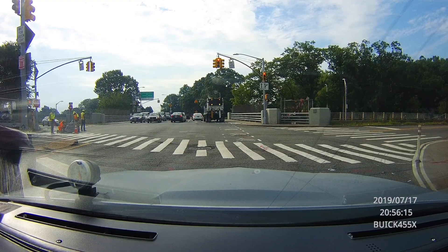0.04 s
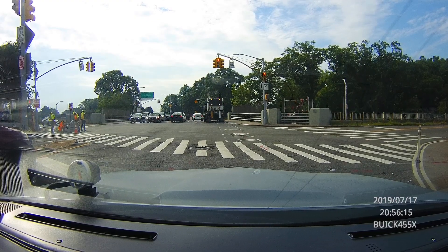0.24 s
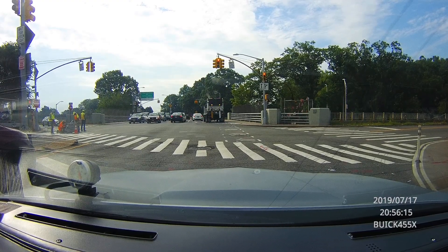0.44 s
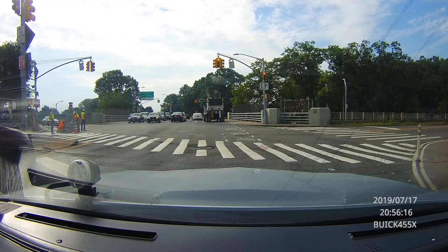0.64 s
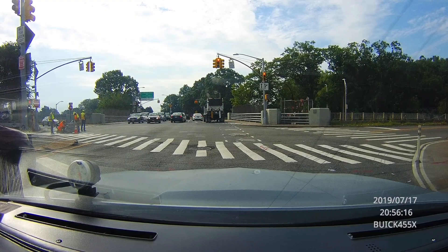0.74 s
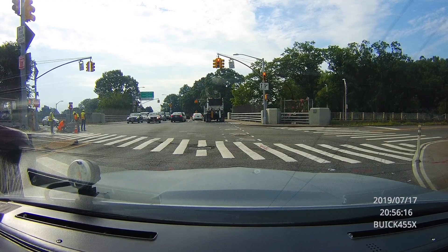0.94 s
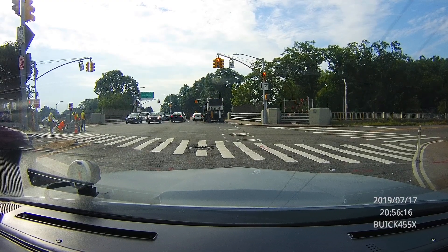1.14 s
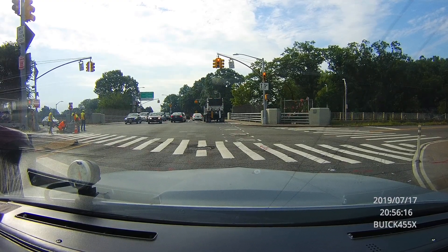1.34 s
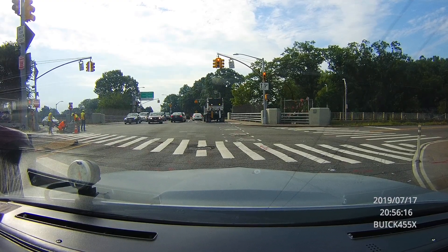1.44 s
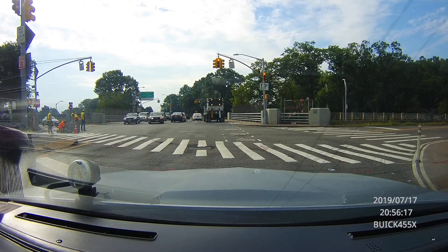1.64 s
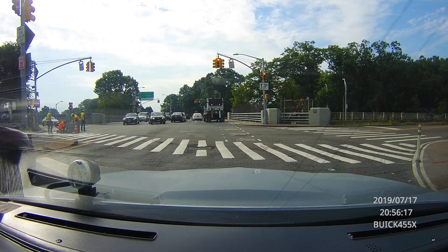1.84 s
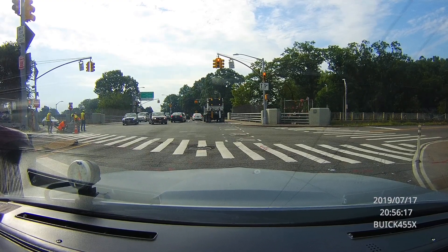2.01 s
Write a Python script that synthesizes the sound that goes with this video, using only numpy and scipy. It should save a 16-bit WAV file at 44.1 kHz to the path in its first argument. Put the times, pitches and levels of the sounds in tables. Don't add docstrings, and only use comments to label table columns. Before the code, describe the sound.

Inside a stopped car, a V8 idle rumbles low and lumpy throughout, firings thumping the floor and doors, trim knocking lightly, thin whines and tiny belt squeaks beneath; mono, dull on top, picked up at the dashboard.

```python
import sys
import numpy as np
from scipy import signal
from scipy.io import wavfile
from scipy.ndimage import uniform_filter1d

SR = 44100
rng = np.random.default_rng(int(sys.argv[2]) if len(sys.argv) > 2 else 0)


def elevation(decibels):
    levels = np.asarray(decibels, float)
    return 10 ** (levels / 20)


def digitize_waveform(pressure):
    field = np.atleast_2d(pressure).T
    bounded = np.clip(field, -1, 1)
    quanta = np.round(bounded * 32767).astype(np.int16)
    wavfile.write(sys.argv[1], SR, quanta)


N = 91463


def evened(x):
    return x / np.sqrt(np.mean(x ** 2) + 1e-20)


def add(mix, s, sound):
    part = mix[max(round(s * SR), 0):][:len(sound)]
    part += sound[:len(part)]


def resonate(x, hz, width_hz):
    spin = np.exp(2j * np.pi * hz * np.arange(len(x)) / SR)
    r = np.exp(-np.pi * width_hz / SR)
    smooth = signal.lfilter([(1 - r) ** 2], [1, -2 * r, r * r], x / spin)
    return 2 * (spin * smooth).real


def body(drive, modes):
    return sum(elevation(db) * evened(resonate(drive, hz, width_hz)) for hz, width_hz, db in modes)


def slow(rate_hz):
    pole = np.exp(-2 * np.pi * rate_hz / SR)
    return evened(signal.lfilter([1], [1, -pole], rng.standard_normal(N)))


def blows(table, gain_db, half_s, glide):
    out = np.zeros(N + SR)
    t = np.arange(-half_s, 2 * half_s, 1 / SR)
    stretched = np.where(t < 0, t / half_s / 0.85, t / half_s / 1.47)
    shape = np.cos(np.pi / 2 * np.clip(stretched, -1, 1)) ** 2
    for (s, db, hz), lag in zip(table, rng.random(len(table))):
        ring = np.cos(2 * np.pi * (hz * t * (1 + glide * t / half_s) + lag))
        add(out, s - half_s + 1, elevation(db + gain_db) * shape * ring)
    return out[SR:]


# time in seconds, engine speed in four-stroke cycles per second [Hz].
IDLE_SPEED = [(0, 4.39), (0.131, 4.18), (.33, 4.49), (.48, 3.92), (.64, 3.95), (.73, 4.38), (.9, 4.25),
              (1.1, 4.54), (1.23, 4.51), (1.34, 4.35), (1.45, 4.36), (1.6, 4), (1.73, 4.53), (1.83, 4.32),
              (1.948, 4.33), (2.07, 4.1)]


def cycles():
    s, hz = np.transpose(IDLE_SPEED)
    speed = uniform_filter1d(np.interp(np.arange(N) / SR, s, hz), size=2000)
    return np.cumsum(speed) / SR


# dash buzz, valve clatter, bright fizz, all in dB.
TURN_STRENGTHS = [(0, 2, -1.5), (5, 1, 1), (-2.5, 3.2, -1), (3.5, -1.2, -3), (-3, 0.5, -.5),
                  (-4.5, -2, -4.5), (1, -.8, -1.5), (-2.5, 5, 1), (0, -1.5, -3.5), (3, 2.5, 1),
                  (1.5, -.3, -3), (-1.5, -1, -2), (-0.5, 1, -1), (-4.5, -1, -5.5), (-1, 1, 1),
                  (-1.5, 0.5, -2), (2.5, -0.7, -0.5), (0, -1.5, -0.5), (4, 4.5, 2)]


def shake(at, depth_db, puff_db, column):
    turn = 2 * cycles() - at
    strength_db = np.interp(turn, np.arange(len(TURN_STRENGTHS)), np.array(TURN_STRENGTHS)[:, column])
    fire = 4 * turn
    size = rng.uniform(-1, 1, 200)[np.floor(fire).astype(int) + 2]
    puff = size * np.sin(np.pi * (fire % 1)) ** 2
    return elevation(strength_db + depth_db * np.cos(2 * np.pi * turn) + puff_db * puff)


# multiple of the cycle rate, rms level in dB, lag in waves
BANK_ORDERS = [(7, -45, 0), (9, -37.5, -.27), (11, -26, -.31), (13, -33.5, -.29)]


def burble():
    slip_s, slip_length_s = 0.609, 0.53
    slip = np.clip((np.arange(N) / SR - slip_s) / slip_length_s, 0, 1)
    out = np.zeros(N)
    for multiple, db, lag in BANK_ORDERS:
        waver_db = 0.8 * evened(uniform_filter1d(slow(4), size=3000))
        tone = np.cos(2 * np.pi * (multiple * cycles() - lag - slip))
        out += elevation(db + waver_db) * np.sqrt(2) * tone
    return out


def firings():
    return np.diff(np.floor(8 * cycles()), prepend=0) * rng.standard_normal(N)


# peak in seconds, level in dB, ring in Hz, half
# width in seconds.
BOOM_SWELLS = [(0, -11, 71, 0.062), (0.112, -12, 86.6, 0.071), (0.257, -10, 82.9, 0.067),
               (0.335, -16, 83.5, 0.064), (0.477, -9, 84.3, 0.071), (0.611, -9.5, 80.9, 0.059),
               (0.695, -14, 81.2, 0.079), (0.774, -8, 77.64, 0.065), (0.84, -9.5, 83.9, 0.067),
               (0.927, -12.5, 79, 0.036), (0.981, -9, 77.3, 0.034), (1.052, -14, 78.6, 0.099),
               (1.111, -11.5, 81.9, 0.052), (1.159, -13.5, 87.3, 0.047), (1.306, -10, 82.37, 0.057),
               (1.446, -9.5, 80.4, 0.058), (1.542, -12.5, 80.8, 0.066), (1.6, -15, 75.2, 0.065),
               (1.652, -10.5, 76.6, 0.048), (1.731, -13, 80.8, 0.054), (1.79, -10.5, 81.1, 0.044),
               (1.866, -10.5, 83.6, 0.051), (1.989, -8.5, 79.6, 0.051),
               (0.067, -18, 79.3, 0.04), (.16, -17.5, 77.3, 0.063), (1.685, -12.5, 75.04, 0.016),
               (0.209, -12, 77.4, 0.037), (0.422, -11, 78.6, 0.066), (.545, -16, 76.5, 0.084),
               (.89, -13.5, 78.4, 0.048), (1.008, -12.5, 77, 0.041), (1.2, -15, 85.76, 0.057),
               (1.346, -11, 81.7, 0.075), (1.381, -14.5, 79.7, 0.039), (1.83, -15.5, 86, 0.051),
               (2.027, -10.5, 83.1, 0.06)]
RING_REVERSALS = [0.724, 1.079, 1.26, 1.409, 1.484, 1.706, 1.754, 1.929, 2.066]


def boom(fired):
    mode_hz, width_hz, murmur_db, reversal_s = 81.9, 45, -33, 0.0081
    t = np.arange(N) / SR
    power = np.zeros(N) + 1e-6
    pull = power * mode_hz
    for s, db, hz, half_s in BOOM_SWELLS:
        swell = elevation(2 * db) * np.cos(np.pi / 2 * np.clip((t - s) / half_s, -1, 1)) ** 4
        power = power + swell
        pull = pull + swell * hz
    flips = np.prod([np.tanh((t - s) / reversal_s) for s in RING_REVERSALS], axis=0)
    ring = np.sqrt(power) * flips * np.cos(2 * np.pi * (np.cumsum(pull / power) / SR + 0.3))
    return ring + body(fired, [(mode_hz, width_hz, murmur_db)])


# frequency in Hz, width in Hz, rms level in dB.
FLOOR_MODES = [(29.4, 11, -43), (101.8, 16, -44), (136.3, 14, -43), (158.8, 28, -44), (221.9, 30, -49.5),
               (302.2, 17.7, -54), (352.8, 20, -58)]


def floor(fired):
    rough = fired + 0.063 * rng.standard_normal(N)
    return body(rough * shake(0.21, depth_db=0.2, puff_db=3.6, column=0), FLOOR_MODES)


# frequency in Hz, width in Hz, level in dB.
DASH_MODES = [(533.4, 5.9, -8), (557, 17, -12), (615.7, 36, 1.5), (671, 46, -2), (715, 54, -0.5)]
# peak in seconds, level in dB, ring in Hz.
TRIM_KNOCKS = [(0.008, -35.5, 689), (0.023, -43, 676), (0.041, -35, 635), (0.057, -38.5, 668),
               (0.11, -35, 690), (0.137, -38.5, 660), (0.157, -38, 629), (0.179, -41, 650),
               (0.203, -39, 670), (0.224, -34.5, 696), (0.253, -31.5, 647), (0.299, -40, 620),
               (0.315, -40, 624), (0.342, -37, 656), (0.359, -33.5, 688), (0.442, -36, 680),
               (0.482, -28.5, 656), (0.581, -36.5, 663), (0.627, -44, 640), (0.717, -34, 655),
               (0.804, -38, 637), (0.846, -28.5, 664), (0.894, -43, 625), (0.93, -39, 719.7),
               (0.96, -36, 645), (0.978, -35, 650), (1.001, -41, 663), (1.05, -37.5, 657.3),
               (1.072, -38.5, 641), (1.162, -33.5, 628), (1.177, -33, 665), (1.192, -36, 644),
               (1.216, -34.5, 636), (1.3, -33, 659.4), (1.345, -48, 624), (1.363, -40, 671),
               (1.389, -34.5, 627), (1.421, -44, 645.4), (1.506, -38, 633), (1.528, -32, 628),
               (1.558, -40.5, 623), (1.65, -31, 658.6), (1.714, -41, 669), (1.737, -35.5, 660),
               (1.755, -35, 667), (1.861, -33.5, 667.5), (1.895, -39, 638.3), (1.962, -33.5, 667),
               (1.986, -34.5, 666), (2.019, -38, 668), (2.038, -47, 650.3), (2.054, -38, 650)]


def buzz():
    rattle = np.zeros(N)
    for mode in DASH_MODES:
        drive = rng.standard_normal(N) * shake(0.01, depth_db=4.5, puff_db=4.5, column=0)
        rattle += body(drive, [mode])
    return elevation(-49) * evened(rattle) + blows(TRIM_KNOCKS, gain_db=-1.5, half_s=0.01, glide=-0.026)


# frequency in Hz, width in Hz, level in dB.
GEAR_MODES = [(2347, 33, -5), (2523, 460, 3), (2963, 280, -2), (5470, 1300, 3), (6130, 140, -9.5),
              (7030, 1400, 3.5), (8550, 850, -6), (9790, 1400, 1.5), (12700, 2500, -3)]
# start in seconds, frequency in Hz, level in dB.
VALVE_TICKS = [
    (.335, 4270, -56.5),
    (0.694, 4406, -58),
    (1.049, 4430, -55),
    (1.165, 9840, -53.5),
    (1.495, 9800, -55),
    (0.709, 9800, -56),
]


def clatter():
    at = 0.066
    grain = elevation(2.0 * np.minimum(rng.exponential(1, N), 5))
    clack = grain * shake(at, depth_db=2.5, puff_db=3.0, column=1)
    fizz = grain * shake(at, depth_db=3.0, puff_db=3.0, column=2)
    out = np.zeros(N)
    for part in GEAR_MODES:
        gain = fizz if part[0] > 8000 else clack
        drift = elevation(uniform_filter1d(slow(24), size=400))
        out += body(rng.standard_normal(N) * gain * drift, [part])
    out = elevation(-57.5) * evened(out)
    t = np.arange(0, .03, 1 / SR)
    for s, hz, db in VALVE_TICKS:
        fade = elevation(db - 600 * t) * np.minimum(t / 0.00079, 1)
        add(out, s, fade * evened(resonate(rng.standard_normal(len(t)), hz, 660)))
    return out


# frequency in Hz, density in dB per Hz.
AIR_SPECTRUM = [(65, -32.5), (110, -10), (135, -38.5), (213, -27.5), (466, -31.5), (635, -27),
                (1820, -42.5), (8020, -59.5), (15200, -61)]


def wash():
    frames, hz = N // 256 + 5, np.fft.rfftfreq(1024, 1 / SR)
    a, b, patches = rng.standard_normal((frames, 513, 3)).T
    patches = uniform_filter1d(uniform_filter1d(patches, size=12, axis=0), size=12, axis=1)
    f, db = np.transpose(AIR_SPECTRUM)
    tilt_db = np.interp(np.log(hz + 1), np.log(f + 1), db)
    z = (a + 1j * b) * elevation(tilt_db[:, None] + 1.0 * evened(patches))
    return elevation(-42.5) * evened(signal.istft(z, nperseg=1024, noverlap=768)[1][:N])


# frequency in Hz, rms level in dB, wander in Hz.
WHINE_TONES = [(1044, -58.5, 4), (1534, -69, 5), (7881, -64, .3)]
# start in seconds, length in seconds, frequency in Hz, level in dB.
BELT_SQUEAKS = [
    (.44, .2, 1454, -55),
    (.41, .13, 5620, -60),
    (.77, .06, 5620, -58),
    (.95, .08, 5620, -61),
    (1.32, .1, 5620, -62),
    (1.44, .04, 5620, -59),
    (1.85, .05, 5620, -60),
    (1.98, .07, 5620, -59),
]


def whines():
    out = np.zeros(N)
    for hz, db, wander_hz in WHINE_TONES:
        phase = 2 * np.pi * np.cumsum(hz + wander_hz * slow(15.2)) / SR
        out += elevation(db) * np.sqrt(2) * np.sin(phase)
    for s, length_s, hz, db in BELT_SQUEAKS:
        t = np.arange(0, length_s, 1 / SR)
        wobble = .007 * hz * slow(60)[:len(t)] * (hz > 3000)
        tone = np.sin(2 * np.pi * np.cumsum(hz + wobble) / SR)
        add(out, s, elevation(db) * np.sin(np.pi * t / length_s) * tone)
    return out


# peak in seconds, level in dB, ring in Hz.
FLOOR_THUMPS = [(0.061, -30.5, 167), (0.095, -41, 157), (0.135, -31, 156), (0.184, -34.5, 146),
                (0.258, -32, 156), (0.322, -49, 150.3), (0.394, -41, 153), (0.521, -45, 146),
                (0.629, -30, 147), (0.742, -29, 148), (0.83, -31, 155.6), (1.012, -38, 167),
                (1.071, -35, 160), (1.104, -38, 157), (1.136, -29, 160), (1.171, -34, 154),
                (1.299, -36.5, 152.3), (1.464, -32, 155.8), (1.507, -35.5, 171), (1.703, -35.5, 160.3),
                (1.78, -31.5, 148), (1.852, -30, 156.4), (2.007, -37, 146.2), (2.065, -25.5, 145.4)]
# peak in seconds, level in dB, ring in Hz.
DOOR_RINGS = [(0.052, -37, 299), (0.174, -38.5, 318), (0.338, -37, 310), (0.381, -39, 331),
              (0.575, -37.5, 321.4), (0.688, -42.5, 315), (0.859, -38.5, 314.4), (0.933, -38.5, 296.3),
              (1.084, -38.5, 310), (1.167, -39.5, 318.3), (1.217, -35, 299.4), (1.325, -38.5, 301.5),
              (1.453, -43, 320), (1.555, -38.5, 313.6), (1.602, -45, 307), (1.675, -39, 299),
              (1.727, -39.5, 309.3), (1.871, -46, 323.7), (1.912, -37, 302), (2.01, -41, 316.7)]


def thumps():
    pan = blows(FLOOR_THUMPS, gain_db=-4.5, half_s=0.026, glide=0.052)
    return pan + blows(DOOR_RINGS, gain_db=-4.5, half_s=0.033, glide=0.014)


def scene():
    fired = firings()
    engine = burble() + boom(fired) + floor(fired) + thumps()
    return (engine + buzz() + clatter() + wash() + whines())[None]


def starve(x):
    hz, _, z = signal.stft(x, SR, nperseg=512)
    frames = z.shape[-1]
    draw = rng.random((33, frames // 2 + 1))
    draw = np.repeat(np.repeat(draw, 8, axis=0), 2, axis=1)[:len(hz), :frames]
    share = 0.3 * np.clip((hz - 11000) / 4000, 0, 1.5) ** 2
    gain = np.where(draw < share[:, None], elevation(-22), 1)
    return signal.istft(z * gain, SR, nperseg=512)[1][:, :N]


def top_cut(x):
    return signal.sosfilt(signal.butter(12, 15350, fs=SR, output="sos"), x)


def record(dry):
    low_cut_hz, roll_hz, roll_db = 21, 14950, -2.5
    cut = signal.sosfiltfilt(signal.butter(3, low_cut_hz, "high", fs=SR, output="sos"), dry)
    corners_hz = [0, roll_hz - 150, roll_hz + 150, SR / 2]
    top = signal.firwin2(401, corners_hz, [1, 1, elevation(roll_db), elevation(roll_db)], fs=SR)
    mix = starve(signal.oaconvolve(cut, top[None], "same"))
    return top_cut(mix)


dry = scene()
out = record(dry)
digitize_waveform(out)
```